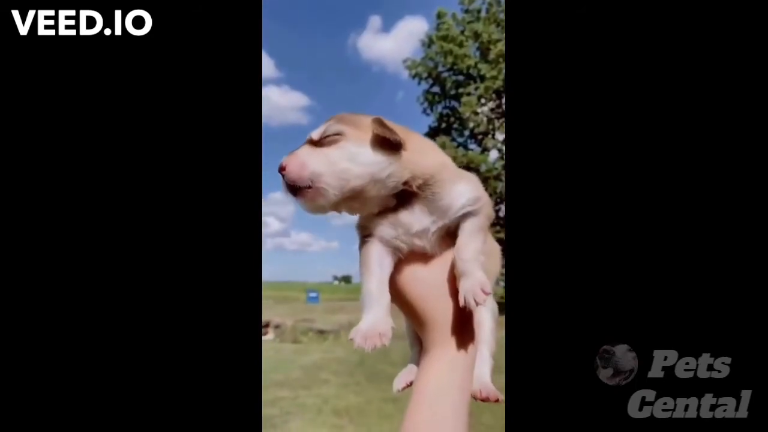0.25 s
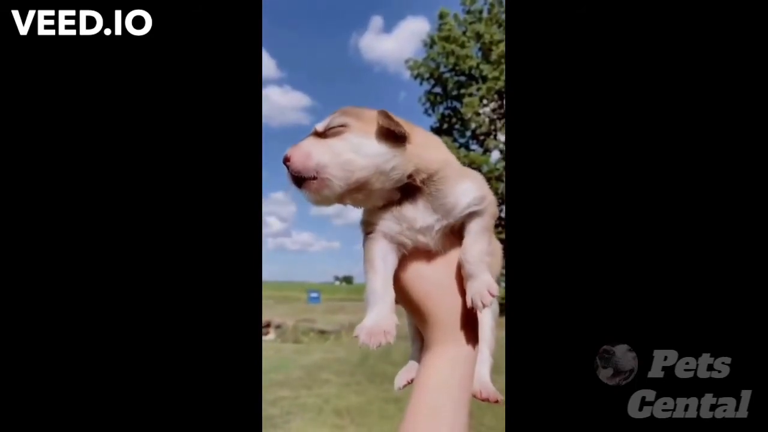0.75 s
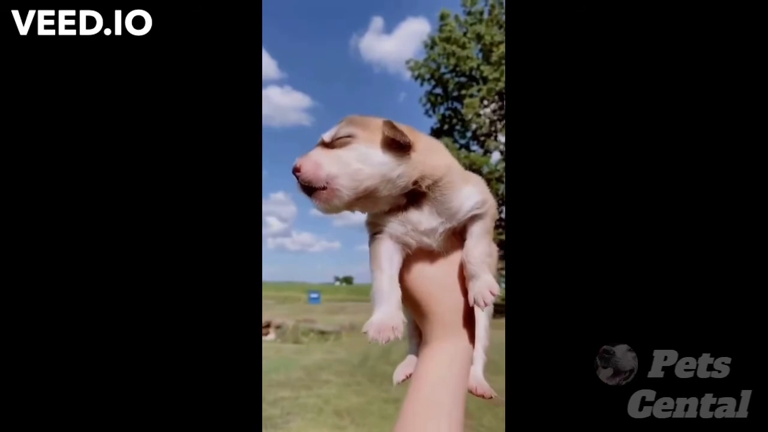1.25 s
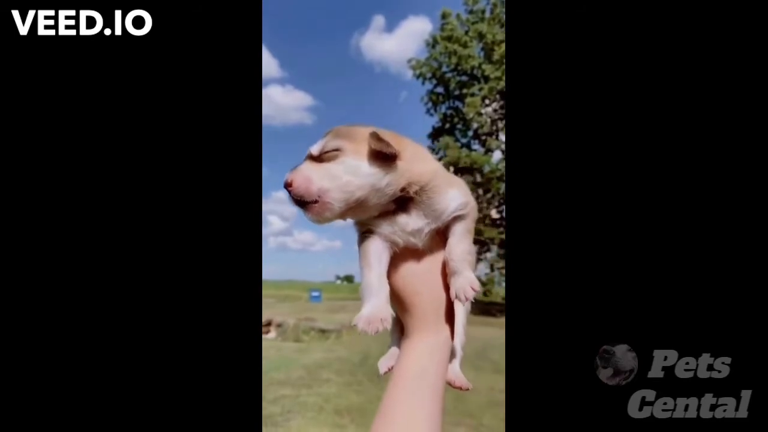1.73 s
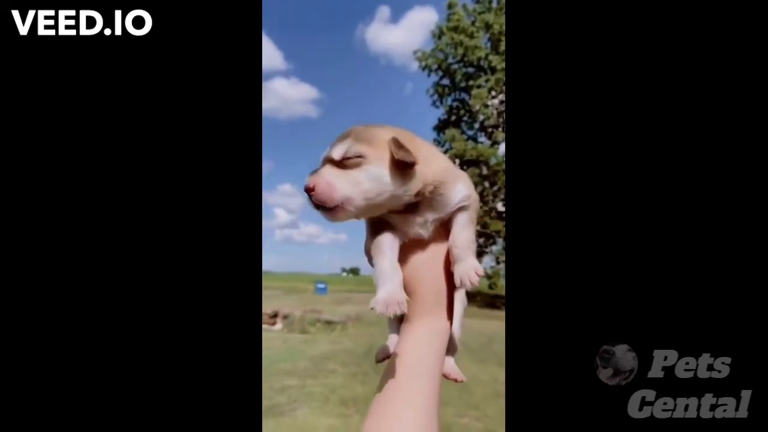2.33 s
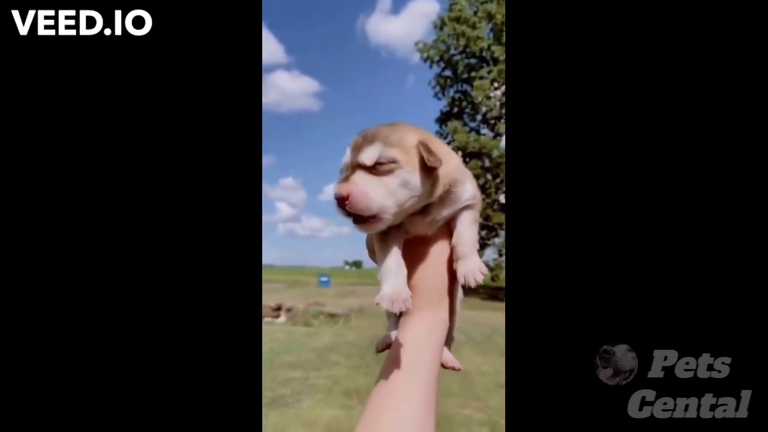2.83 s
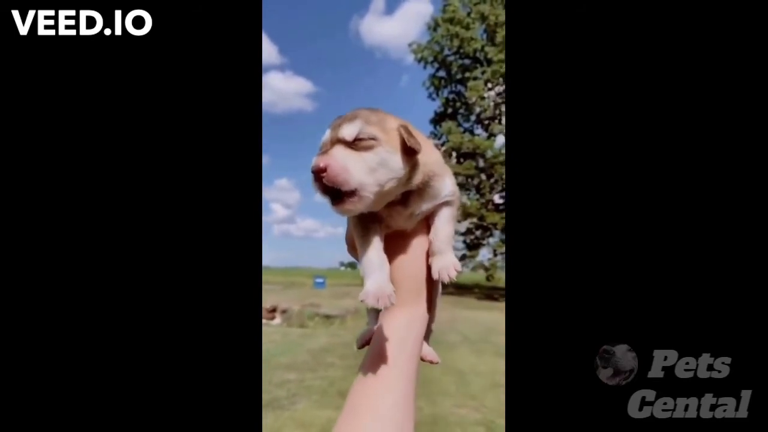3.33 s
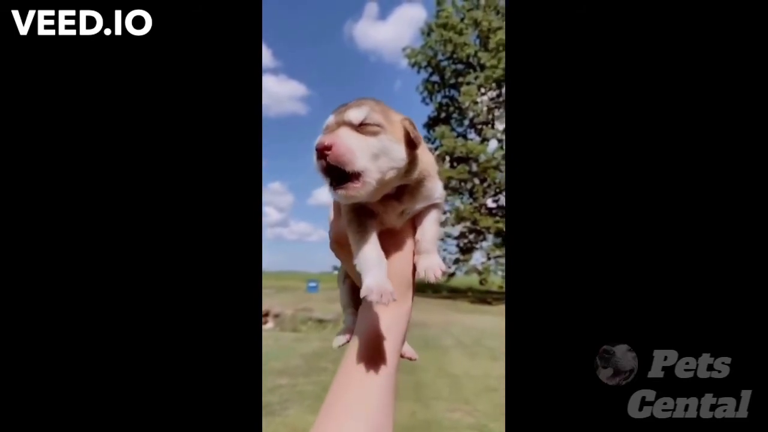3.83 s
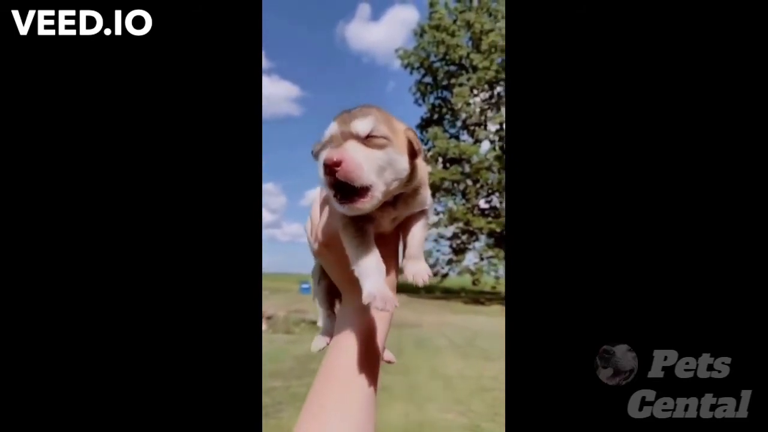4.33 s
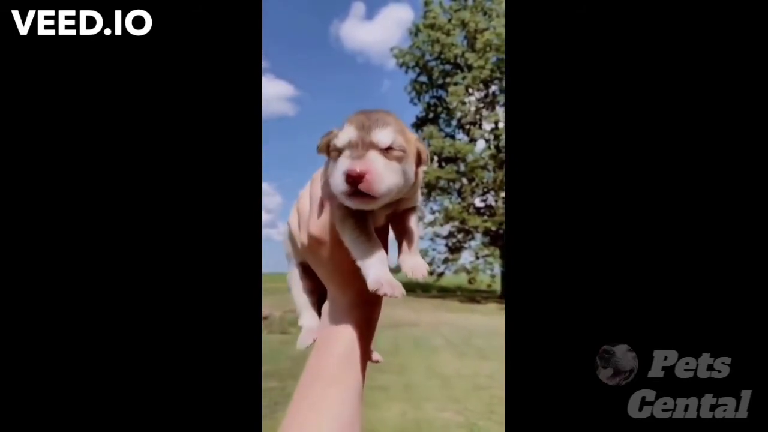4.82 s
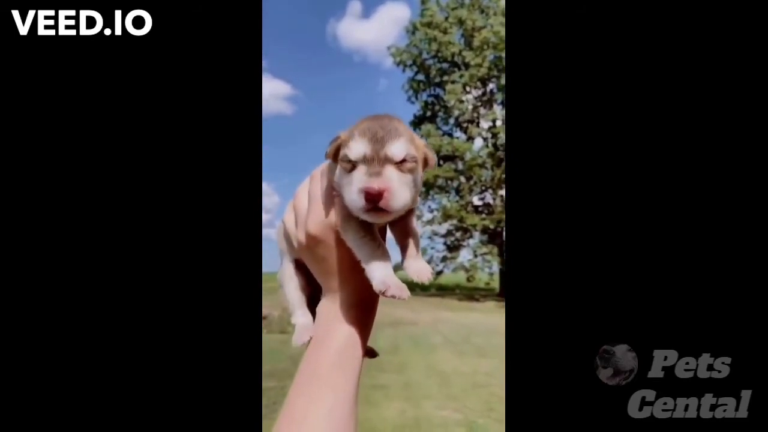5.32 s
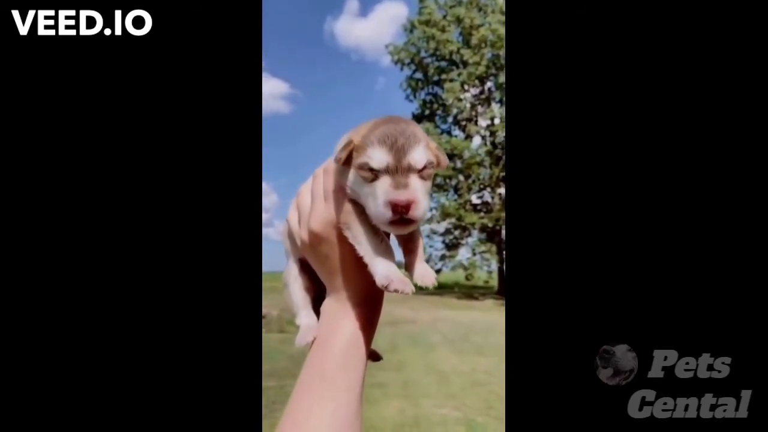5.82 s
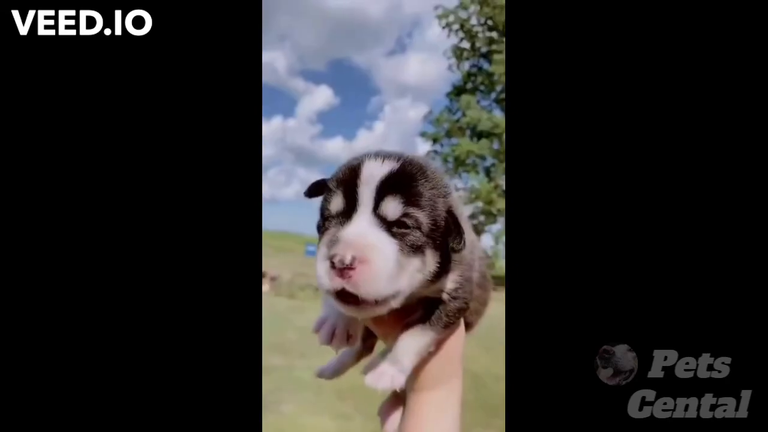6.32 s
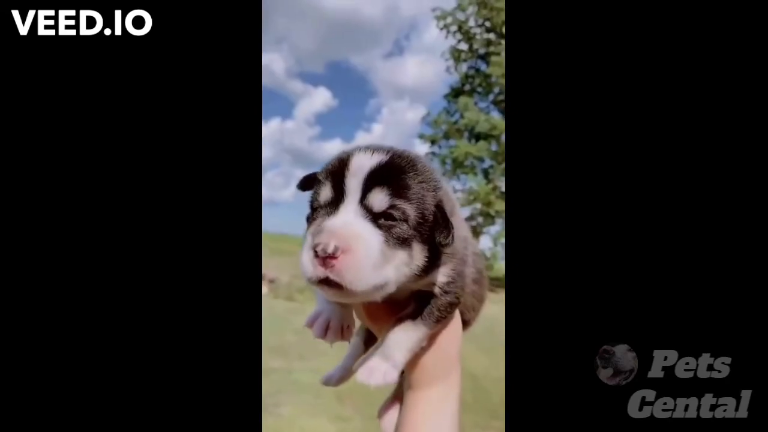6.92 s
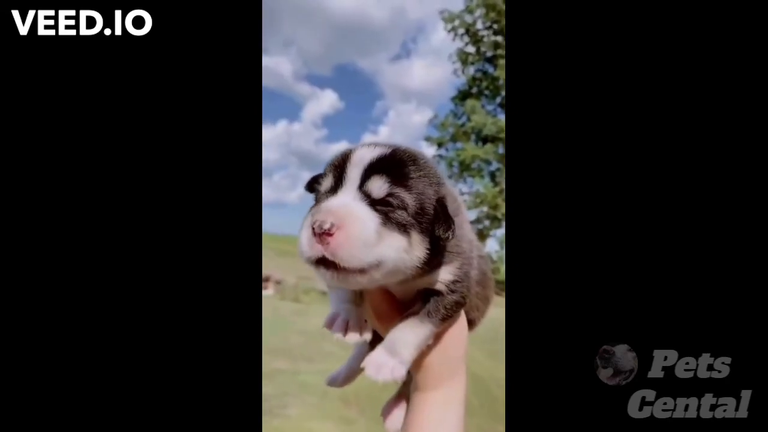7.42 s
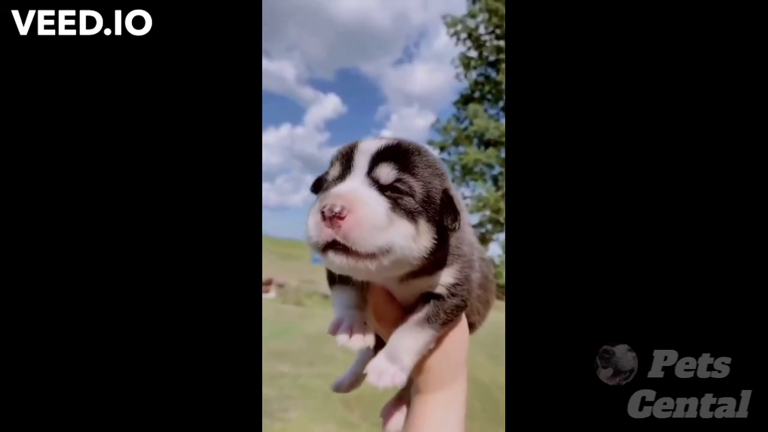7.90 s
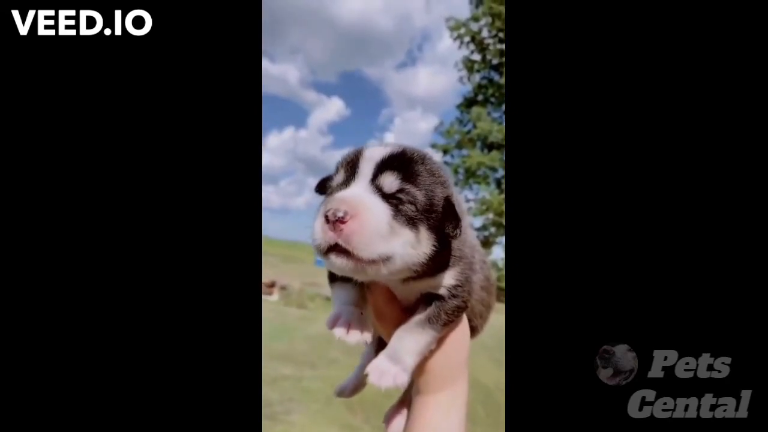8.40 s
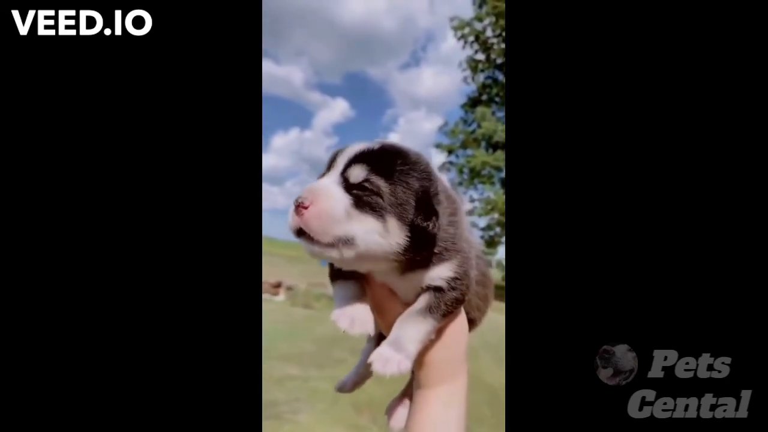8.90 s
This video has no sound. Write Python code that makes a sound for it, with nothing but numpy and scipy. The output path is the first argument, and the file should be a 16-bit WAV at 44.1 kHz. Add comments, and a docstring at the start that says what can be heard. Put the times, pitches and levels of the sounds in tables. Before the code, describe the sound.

Newborn puppies howl in turn close to the microphone outdoors, thin wavering cries sliding and cracking over low buffeting wind.

```python
"""Three very young puppies, held up in turn outdoors, howl close to a microphone.
Wind buffets it throughout: eddy-modulated low noise with gusts and thumps, over a faint rush of air.
The first puppy gives a long falling howl. As the wind strengthens the second wails, then sinks into
a creaky growl. The third yelps, holds a quivering high note that falls away, and ends on a rising cry.
Each voice is a train of vocal-fold pulses plus turbulence, ringing throat and mouth resonances."""
import sys
import numpy as np
from scipy import signal
from scipy.fft import rfft, irfft, next_fast_len
from scipy.io import wavfile
from scipy.ndimage import uniform_filter1d, minimum_filter1d, map_coordinates

SR = 44100
rng = np.random.default_rng(int(sys.argv[2]) if len(sys.argv) > 2 else 0)


def to_wav(s):
    """Save 16-bit WAV."""
    ch = np.atleast_2d(s).T  # columns
    pcm = np.round(np.clip(ch, -1, 1) * 32767)  # PCM
    wavfile.write(sys.argv[1], SR, pcm.astype(np.int16))


N = 403515

LURCH_HZ = 36.25  # random turns a second of a broken voice
CALM_FLUTTER, SHAKY_FLUTTER = .005, .009  # random pitch flutter, share of the pitch


def amp(db):
    """Decibels to gain."""
    return 10 ** (np.asarray(db) / 20)


def unit(x):
    """x at rms 1."""
    return x / np.sqrt(np.mean(x ** 2) + 1e-20)


def curves(rows, t):
    """Each column after the time, read at the times t."""
    s, *cols = np.transpose(rows)
    return [np.interp(t, s, c) for c in cols]


def wobble(t, rate_hz):
    """A smooth random curve with rate_hz knots a second."""
    at = (t - t[0]) * rate_hz
    return map_coordinates(rng.standard_normal(int(at[-1]) + 4), [at + 1])


def bump(t, at_s, width_s):
    """A bell of height 1 that falls to 1/e at width_s either side."""
    return np.exp(-((t - at_s) / width_s) ** 2)


def coloured(x, points):
    """x through a minimum-phase filter with the given (f/Hz, level/dB) shape."""
    size = 2 * next_fast_len(len(x) // 2 + 4096)
    hz, db = np.transpose(points)
    log_hz = np.log(np.fft.rfftfreq(size, 1 / SR) + 1)
    gain = amp(np.interp(log_hz, np.log(hz), db))
    # Folding the cepstrum makes the filter causal.
    cepstrum = irfft(np.log(gain))
    cepstrum[1:size // 2] *= 2
    cepstrum[size // 2 + 1:] = 0
    return irfft(rfft(x, size) * np.exp(rfft(cepstrum)))[:len(x)]


def below(x, edge_hz, order):
    """The part of x under an edge, by a zero-phase low-pass."""
    size = next_fast_len(len(x) + 4096)
    rolloff = 1 + (np.fft.rfftfreq(size, 1 / SR) / edge_hz) ** order
    return irfft(rfft(x, size) / rolloff, size)[:len(x)]


def steady(x, span_s=.05):
    """x held at a running rms of about 1."""
    width = max(int(span_s * SR), 8)
    power = uniform_filter1d(uniform_filter1d(x ** 2, width), width // 2)
    return x / np.sqrt(np.abs(power) + 1e-6 * np.mean(x ** 2))


def thumps(t):
    """Eddies that thump the microphone once: a low swing that dies within a cycle or two."""
    # Thumps: t/s, level before decay/dB
    thump_rows = [(1.969, -9), (6.867, -20), (7.037, -13.5)]
    swing_hz, decay_s = 78, 0.0085

    def swing(age_s):
        return np.sin(2 * np.pi * swing_hz * age_s) * np.exp(-age_s / decay_s)

    return sum(amp(db) * swing(np.maximum(t - s, 0)) for s, db in thump_rows)


def wind(t):
    """Eddies buffet and thump the microphone over the faint rush of open air."""
    # Buffet strength: t/s, level/dB
    buffet_level = [(0, -49.5), (1.1, -45.5), (1.9, -31.5), (2.5, -23.5), (3.2, -30), (3.8, -23.5),
                    (4.6, -29.5), (5.8, -25.5), (6.25, -43.5), (6.6, -32.5), (7.3, -43.5), (8.1, -42),
                    (9.15, -50.5)]
    # Single gusts added to it: t/s, peak level/dB
    gusts = [(1.39, -23), (2.04, -27), (3.73, -27), (5.43, -33), (8.0, -41)]
    gust_s = 0.058
    # Buffet spectrum: f/Hz, level per Hz/dB
    rumble = [(15, -71.5), (28, -19.5), (42, -2.5), (70, 0.5), (140, -9.5), (250, -24.5), (420, -42),
              (900, -60)]
    # Air rush spectrum: f/Hz, level per Hz/dB
    air_colour = [(200, -7.5), (350, -10.5), (550, -14), (2300, -23), (4000, -31), (13000, -55)]
    # Air rush strength: t/s, level/dB
    air_level = [(0, -59), (2.3, -53), (3.5, -54), (4.8, -49), (6.25, -47), (7.6, -58), (8.4, -50.5),
                 (9.15, -49)]

    eddies = np.tanh(wobble(t, 22))
    buffet = unit(coloured(rng.standard_normal(N), rumble))
    # The strongest eddies reach highest in pitch.
    deep = below(buffet, 150, order=4)
    upper = buffet - deep
    buffet = unit(deep * amp(3.4 * eddies) + upper * amp(12.5 * eddies - 6))
    air = unit(coloured(rng.standard_normal(N), air_colour)) * amp(1.3 * wobble(t, 6))
    strength = amp(curves(buffet_level, t)[0])
    strength = strength + sum(amp(db) * bump(t, s, gust_s) for s, db in gusts)
    buffeting = below(strength * buffet + thumps(t), 1400, order=4)
    return buffeting + amp(curves(air_level, t)[0]) * air


def pulses(at, sizes, count):
    """Clicks placed between samples by a windowed sinc."""
    taps = np.floor(at)[:, None] + np.arange(-7, 9)
    off = taps - at[:, None]
    shape = np.sinc(off) * np.cos(np.pi * off / 16) ** 2
    index = np.clip(taps, 0, count - 1).astype(int)
    return np.bincount(index.ravel(), (sizes[:, None] * shape).ravel(), count)


def quiver(t, hz, depth, rate_hz, slowing_hz_per_s, crest_s):
    """A quick swing of pitch, deeper on high notes, that slows at a steady rate."""
    # Swing at depth 1: f/Hz, share of the pitch
    swing_by_pitch = [(450, 0.0076), (1000, 0.062)]
    since = t - crest_s
    cycles = since * (rate_hz - slowing_hz_per_s * since / 2)
    return depth * curves(swing_by_pitch, hz)[0] * np.cos(2 * np.pi * cycles)


def strain(t):
    """Treble in dB: each push of effort within the call builds up and relaxes at its own speed."""
    # Pushes: t/s, treble at the peak/dB, build-up/s, relaxation/s
    pushes = [(.8, -21, 0.28, 0.75), (2.12, -25, 0.4, .3), (2.589, -8.5, 0.24, 0.29),
              (4.348, -23.5, 1.5, 2.6), (5.188, -7.5, 0.097, 0.41), (6.13, -15, 0.87, 0.59),
              (6.422, -8.5, 2.8, 1.44), (7.151, -3, 0.067, 0.16), (8.112, -23, 0.33, 0.43),
              (8.639, -7.5, 0.87, .38), (8.959, -9, 0.17, 0.14)]
    range_db, relaxed_db = 20, -33  # range: gained in one build-up, lost in one relaxation
    levels_db = [db - range_db * np.maximum((s - t) / build_s, (t - s) / relax_s)
                 for s, db, build_s, relax_s in pushes if t[0] < s < t[-1]]
    return np.maximum(np.max(levels_db, axis=0), relaxed_db)


def roughness(t, start_s, strain_db):
    """Rasp, split and creak: folds rasp under strain, most as they start, and where the voice breaks."""
    # Breaks: from/s, to/s, rasp/0-1, split into long and short beats/0-1, creak once in three beats/0-1
    breaks = [(1.588, 1.789, 0.5, 0.5, 0), (1.821, 2.18, 0.7, 0.26, 0), (2.748, 2.832, 0.94, 0, 0),
              (4.059, 4.394, 0.1, .8, 0.2), (4.391, 4.619, 0.57, 0.19, 0.17),
              (5.016, 5.154, 0.52, 0.25, 0.9), (5.287, 5.447, .06, 0.24, 0.34),
              (5.607, 5.877, 0.51, 0.27, 0.91), (5.881, 6.182, 0.25, 0.19, 0.94)]
    slip_s = 0.024  # time to slip into or out of a break
    calm_rasp, strain_rasp = 0.021, .16
    onset_rasp, onset_s = 0.75, .03

    def inside(on, off):
        return np.clip(np.minimum(t - on, off - t) / slip_s + .5, 0, 1)

    rasp, split, creak = sum(np.outer(state, inside(on, off)) for on, off, *state in breaks)
    rasp = rasp + calm_rasp + amp(strain_db) * (strain_rasp + onset_rasp * bump(t, start_s, onset_s))
    split = split * (1 + wobble(t, LURCH_HZ))  # split beats come and go
    return np.clip([rasp, split, creak], 0, 1)


def folds(t, hz, rasp, split, creak):
    """The beating vocal folds: their pulses, and the turbulence let through with each beat."""
    jitter = .001 * wobble(t, 190)
    rough_jitter = .03 * wobble(t, 190) + .035 * wobble(t, 65)
    hz = hz * (1 + jitter + rasp * rough_jitter)
    cycles = np.cumsum(hz) / SR
    beat = np.arange(1, int(cycles[-1]))
    at = np.interp(beat, cycles, np.arange(len(t)))
    i = at.astype(int)
    late, strong, slip = rng.standard_normal((3, len(beat)))
    # Slack folds alternate long and short beats, or swell and stall once in three.
    limp = split[i] * (-1) ** beat
    shift = .035 * rasp[i] * late + .07 * limp  # in cycles
    stall = np.sin(np.pi * beat / 3 + .2 * np.cumsum(rasp[i] * slip)) ** 2
    sizes = amp(4 * rasp[i] * strong) * (1 + .4 * limp) * (1 - creak[i] * stall)
    voice = unit(pulses(at + shift * SR / hz[i], sizes, len(t)))
    gate = np.interp(cycles, beat, sizes) * (1 + 0.29 * np.cos(2 * np.pi * cycles))
    return voice, unit(gate * rng.standard_normal(len(t)))


def resonance(x, hz, width_hz):
    """A moving resonance, cross-faded from five fixed ones."""
    centres = np.linspace(hz.min(), hz.max(), 5)
    rings = [signal.lfilter(*signal.iirpeak(c, c / width_hz, SR), x) for c in centres]
    shares = np.eye(len(centres))
    return sum(np.interp(hz, centres, share) * ring for share, ring in zip(shares, rings))


def call(pitch, delivery, throat, bright_db, lift, flutter, swing=None, mouth=None, strained=None):
    """One call: fold pulses ring the throat; an open mouth and strain bring out its upper resonances."""
    # Catches in the voice: t/s, jump/share of the pitch
    catches = [(3.015, -0.045), (3.1, -0.094), (3.194, -.08), (3.289, -0.092), (3.667, -0.1),
               (3.721, -0.088), (6.494, 0.16), (6.602, 0.12), (7.193, -0.064), (7.314, -0.057)]
    catch_s = 0.01
    # Reflections off hand, arm and ground: delay/s, gain
    nearby = [(.0013, 0.06), (.0031, 0.091), (.0074, 0.07)]
    attack_s, release_s = 0.013, 0.02  # before the first and after the last delivery row
    lurch = .045  # pitch share at full rasp
    quiver_db_per_share = 13  # each crest of the quiver is louder too

    first = max(int((pitch[0][0] - .03) * SR), 0)
    last = min(int((pitch[-1][0] + .04) * SR), N)
    t = np.arange(first, last) / SR
    start_s, end_s = delivery[0][0], delivery[-1][0]
    loud_db, mouth_db = curves(delivery, t)
    strain_db = strain(t)

    hz = uniform_filter1d(curves(pitch, t)[0], size=300) * (1 + flutter * wobble(t, 58))
    shake = quiver(t, hz, *swing) if swing else 0
    hz *= 1 + shake + sum(jump * bump(t, s, catch_s) for s, jump in catches)
    rasp, split, creak = roughness(t, start_s, strain_db)
    voice, air = folds(t, hz * (1 + lurch * rasp * wobble(t, LURCH_HZ)), rasp, split, creak)

    # Strain widens a narrowed throat.
    wide = np.clip((strain_db + 24.5) / 12, 0, 1)

    def ring(x):
        if strained:
            return (1 - wide) * coloured(x, throat) + wide * coloured(x, strained)
        return coloured(x, throat)

    # Near reflections ripple the response, so each overtone twinkles as it slides.
    echoes = sum(gain * np.pad(voice, (int(delay_s * SR), 0))[:len(t)] for delay_s, gain in nearby)
    voice = voice + echoes
    tone = ring(voice + (.002 + .13 * rasp) * air)
    tone = below(tone - below(tone, 260, order=8), 3550, order=30)
    low = below(tone, 1250, order=16)
    middle = below(tone - low, 1900, order=12)
    # Straining lifts the resonance near 2.7 kHz along with the treble.
    upper = middle + amp(bright_db + lift * (strain_db + 15.5)) * (tone - low - middle)
    if mouth:
        upper = resonance(upper, curves(mouth, t)[0], width_hz=114)

    # Without strain the folds close softly and turbulence takes over more of the treble.
    airy = .24 + .5 * rasp + np.clip(-(strain_db + 22) / 20, 0, .5)
    treble = ring(voice + airy * air)
    treble = treble - below(treble, 3510, order=30)

    opening = np.clip(amp(mouth_db) ** 2, 0, .93)  # upper share of the power
    overtones = np.sqrt(opening) * steady(upper) + amp(strain_db) * steady(treble)
    sound = np.sqrt(1 - opening) * steady(low) + amp(1.1 * wobble(t, 50)) * overtones
    edges = np.clip(1 + np.minimum((t - start_s) / attack_s, (end_s - t) / release_s), 0, 1)
    level = amp(loud_db + quiver_db_per_share * shake) * edges
    return np.pad(level * sound, (first, N - last))


def first_puppy():
    """A long falling howl that quivers and breaks into a rasp."""
    # Pitch line: t/s, f/Hz
    howl_pitch = [(0.0, 948), (0.431, 803), (0.52, 719), (0.586, 741), (0.889, 601), (1.155, 551),
                  (1.56, 456), (1.76, 452), (1.88, 412), (2.13, 345)]
    # Delivery: t/s, loudness/dB, mouth opening as upper resonances/dB
    howl = [(0.01, -26.5, -9.5), (0.43, -26, -2), (0.45, -21.5, -1), (0.64, -21.5, 0.5), (0.76, -30.5, -2),
            (0.99, -32.5, -6), (1.25, -25.5, -1.5), (1.62, -28, -12), (1.64, -31.5, -5.5),
            (1.83, -30, -10.5), (2.11, -38.5, -13), (2.13, -48, -14)]
    # Throat and mouth: f/Hz, level/dB
    throat = [(220, -7), (450, -7.5), (900, 2.5), (1200, -3.5), (1520, 4), (1850, -11.5), (2750, -13.5),
              (3400, -38.5), (4300, -33.5), (6200, -46), (7300, -32.5), (8200, -38), (9800, -27),
              (11500, -38.5)]
    swing = (.9, 24.39, 3.05, .05)  # quiver: relative depth, rate/Hz, slowing/(Hz/s), one crest/s
    return call(howl_pitch, howl, throat, bright_db=-1.0, lift=0.045, flutter=CALM_FLUTTER, swing=swing)


def second_puppy():
    """A shaky wail, then a creaky growl with a sliding mouth resonance."""
    # Pitch lines: t/s, f/Hz
    wail_pitch = [(2.54, 470), (2.591, 613), (2.67, 416), (2.82, 490), (3.0, 830), (3.075, 905),
                  (3.32, 825), (3.34, 745), (3.47, 775), (3.51, 860), (3.82, 845), (3.86, 736), (4.03, 705),
                  (4.19, 540), (4.41, 425), (4.58, 395)]
    growl_pitch = [(5.07, 268.2), (5.215, 481.3), (5.24, 368.6), (5.28, 329.3), (5.295, 604.7), (5.39, 355),
                   (5.435, 274.8), (5.56, 229.3), (5.7, 283.4), (5.8, 235.7), (6.0, 275), (6.14, 275.5)]
    # Deliveries: t/s, loudness/dB, mouth opening as upper resonances/dB
    wail = [(2.54, -31, -6), (2.56, -18, 13), (2.62, -18.5, -0.5), (2.66, -27.5, -3), (2.84, -25.5, -3),
            (2.92, -31.5, -1), (3.01, -18, -0.5), (3.06, -22, -2.5), (3.25, -19.5, -0.5), (3.36, -24, -0.5),
            (3.57, -21.5, -2.5), (4.29, -31, -2), (4.43, -28.5, -11.5), (4.56, -32.5, -8.5), (4.58, -43, 4)]
    growl = [(5.085, -36, -16.5), (5.183, -19.5, 4), (5.359, -26.5, -6), (5.795, -30, -10),
             (5.943, -32, -8), (6.131, -28.5, -2), (6.135, -34, -3.5)]
    # Throat and mouth, wailing and growling: f/Hz, level/dB
    wailing_throat = [(250, -0.5), (450, -4.5), (950, 7.5), (1250, -9.5), (1630, 1), (1830, -1),
                      (2750, 0.5), (3300, -23.5), (4700, -27.5), (5500, -30.5), (7100, -24), (8000, -27),
                      (9600, -15), (11300, -33)]
    growling_throat = [(250, -1.5), (650, -7.5), (960, 6.5), (1300, -8), (1800, -13), (2700, -10.5),
                       (3400, -20), (4000, -26.5), (5200, -13), (6600, -30), (7700, -16), (8600, -22),
                       (10200, -14), (11300, -28)]
    # Mouth resonance sliding through the growl: t/s, f/Hz
    growl_mouth = [(5.07, 2460), (5.2, 2710), (5.3, 2206), (5.5, 2245), (5.8, 2150), (6.14, 2500)]
    swing = (.25, 22.22, 8.87, 3.081)  # quiver: relative depth, rate/Hz, slowing/(Hz/s), one crest/s
    return (call(wail_pitch, wail, wailing_throat, bright_db=-6.5, lift=0.61,
                 flutter=SHAKY_FLUTTER, swing=swing)
            + call(growl_pitch, growl, growling_throat, bright_db=-12.5, lift=0.056,
                   flutter=CALM_FLUTTER, mouth=growl_mouth))


def third_puppy():
    """A yelp, a quivering high note through a narrowed mouth, and a rising cry."""
    # Pitch lines: t/s, f/Hz
    yelp_pitch = [(6.33, 613), (6.428, 567), (6.454, 775), (6.575, 698), (6.588, 756), (6.758, 667),
                  (6.82, 514)]
    song_pitch = [(7.11, 490), (7.248, 999), (7.4, 1081), (7.585, 1077), (7.882, 935), (8.042, 607),
                  (8.088, 617), (8.24, 417)]
    cry_pitch = [(8.62, 510), (8.634, 621), (8.738, 715), (8.837, 635), (8.915, 791), (8.958, 762),
                 (8.991, 939), (9.14, 1088)]
    # Deliveries: t/s, loudness/dB, mouth opening as upper resonances/dB
    yelp = [(6.338, -26.5, -4.5), (6.37, -16.5, 16), (6.48, -19.5, 0), (6.49, -15.5, 6),
            (6.58, -21.5, -1.5), (6.598, -16.5, 0), (6.618, -22, -1.5), (6.748, -24, -1), (6.768, -17, 5),
            (6.804, -24.5, -2), (6.815, -23, -8)]
    song = [(7.112, -27.5, -1), (7.136, -15.5, 4), (7.278, -16.5, 0), (7.382, -27.5, 11),
            (7.442, -23.5, -0.5), (7.9, -19.5, -11.5), (7.93, -18.5, -3.5), (7.994, -19, -0.5),
            (8.086, -25.5, -4), (8.136, -21.5, -1), (8.224, -21, -9.5), (8.245, -29.5, -15)]
    cry = [(8.63, -16, 1.5), (8.684, -13.5, 1), (8.822, -26.5, -3.5), (8.86, -25.5, -14),
           (8.916, -21.5, -2), (8.95, -13.5, -0.5), (9.026, -13.5, -1.5), (9.064, -19.5, -8),
           (9.15, -20, -10.5)]
    # Throat and mouth, open and narrowed for the high note: f/Hz, level/dB
    open_throat = [(300, 2.5), (700, 6.5), (1000, 5.5), (1500, 7.5), (2100, 13), (2800, 18), (3600, -27.5),
                   (4500, -9), (5250, -13), (6000, -33.5), (7800, -9.5), (8600, -23), (9800, -21),
                   (11300, -34)]
    narrowed = [(300, 0.5), (700, 6), (1000, 8.5), (1450, -5), (2100, -5), (2800, 0.5), (3600, -16.5),
                (4150, -10), (4900, -22.5), (6100, -23.5), (7600, -11), (8700, -16), (9700, -14.5),
                (11300, -29)]
    # Quivers: relative depth, rate/Hz, slowing/(Hz/s), one crest/s
    yelp_swing = (1.2, 21.77, 11, 6.496)
    song_swing = (1, 25.87, 9.72, 7.29)
    cry_swing = (1.1, 23.56, 0, 9.072)
    return (call(yelp_pitch, yelp, open_throat, bright_db=-7.5, lift=0.12,
                 flutter=SHAKY_FLUTTER, swing=yelp_swing)
            + call(song_pitch, song, narrowed, bright_db=-14.5, lift=0.49,
                   flutter=CALM_FLUTTER, swing=song_swing, strained=open_throat)
            + call(cry_pitch, cry, open_throat, bright_db=-9.0, lift=0.26,
                   flutter=SHAKY_FLUTTER, swing=cry_swing))


def scene():
    """Wind and the three puppies outdoors, without reverberation."""
    t = np.arange(N) / SR
    return (wind(t) + first_puppy() + second_puppy() + third_puppy())[None]


def record(dry):
    """A limiter holds down the peaks, the level dips briefly twice, and a low-pass limits the band."""
    # Dips: from/s, to/s
    dips = [(6.151, 6.215), (8.53, 8.568)]
    t = np.arange(N) / SR
    ceiling = .66
    needed = ceiling / np.maximum(np.abs(dry[0]), ceiling)
    limiter = uniform_filter1d(minimum_filter1d(needed, size=200), size=100)
    dipped = sum((t > start) & (t < end) for start, end in dips).astype(float)
    gain = limiter * amp(-24 * uniform_filter1d(dipped, size=300))
    return below(dry[0] * gain, 13200, order=200)[None]


dry = scene()
out = record(dry)
to_wav(out)
```